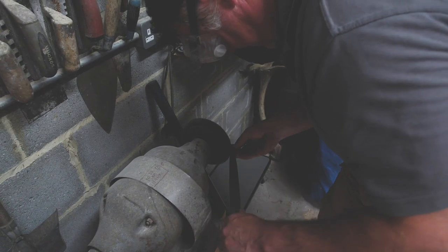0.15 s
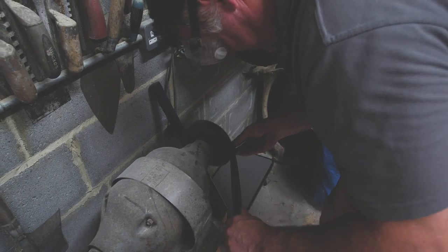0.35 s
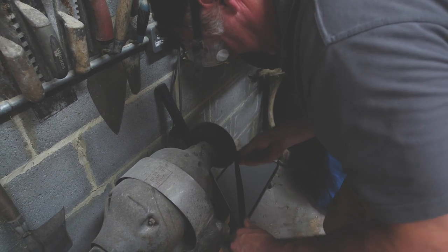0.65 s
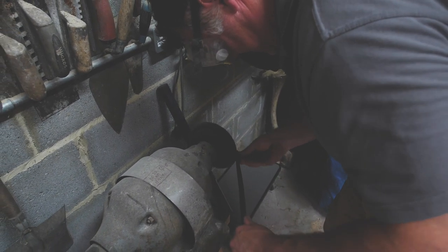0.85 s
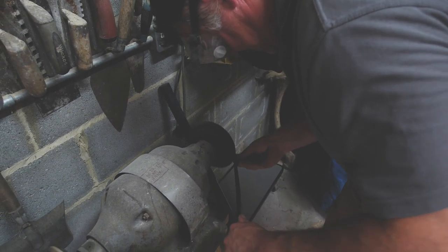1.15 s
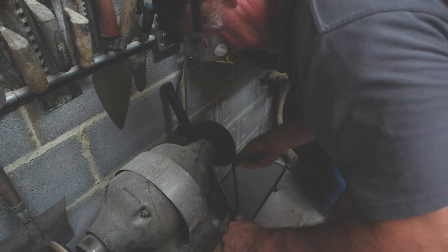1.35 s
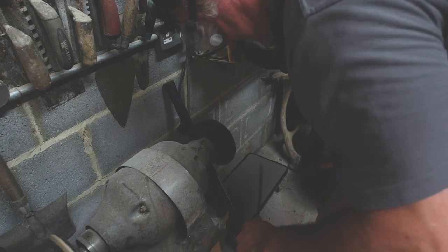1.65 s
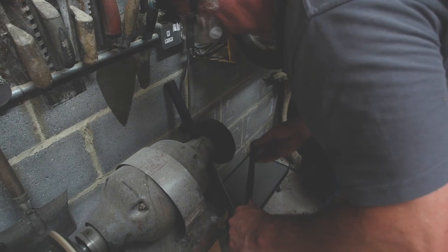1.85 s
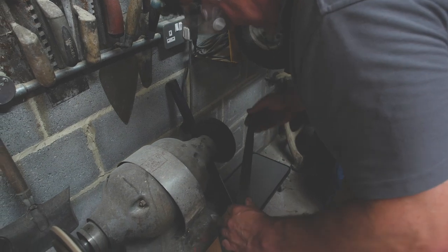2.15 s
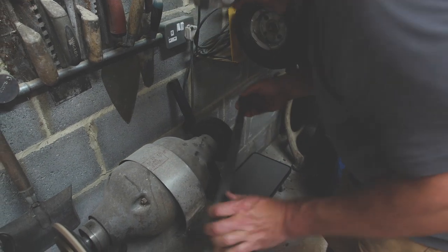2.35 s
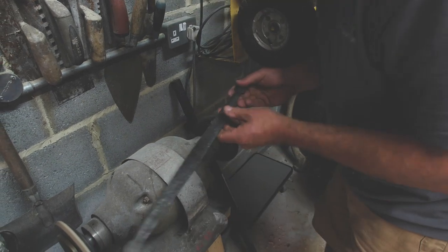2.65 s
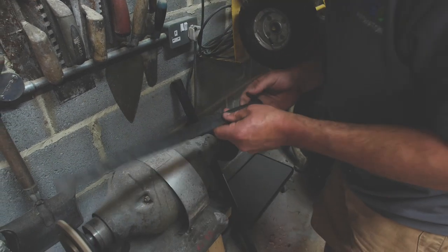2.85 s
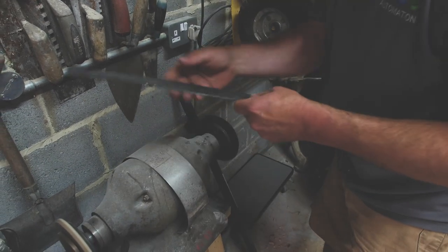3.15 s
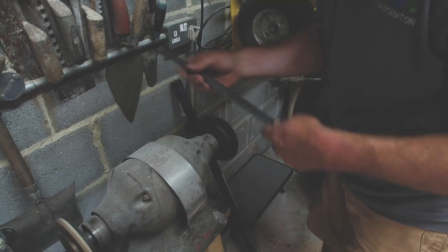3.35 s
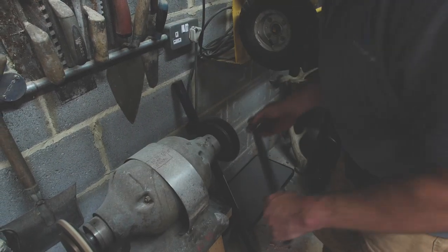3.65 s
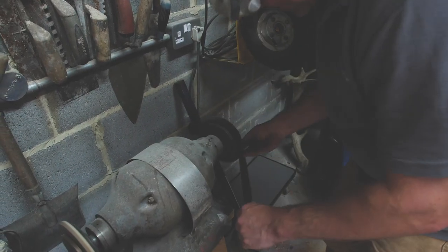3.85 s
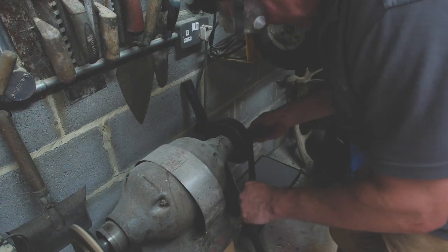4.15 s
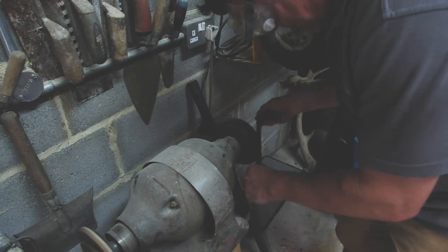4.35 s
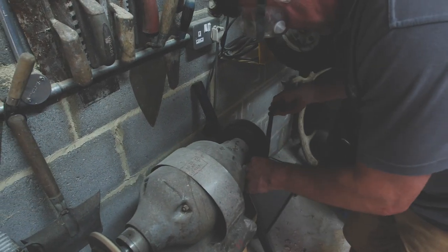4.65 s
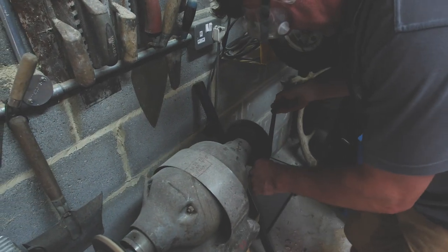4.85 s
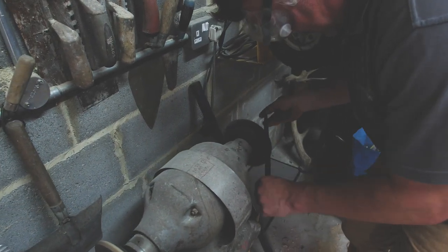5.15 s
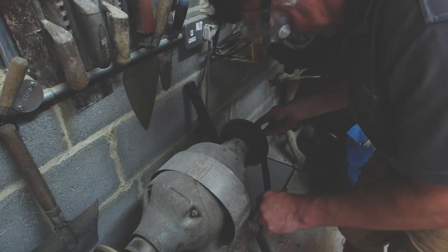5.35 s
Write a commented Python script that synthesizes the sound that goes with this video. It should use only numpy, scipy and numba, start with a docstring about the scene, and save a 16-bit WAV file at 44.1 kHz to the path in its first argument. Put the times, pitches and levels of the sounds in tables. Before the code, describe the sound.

Close, centred sound of a bench grinder: loud ringing steel at first, fading to a rough hiss that varies with hand pressure. The grinding stops for over two seconds, exposing a steady motor hum, rumble, fast faint ticks and small double knocks. Then steel touches again, swelling briefly and thinning into a gritty scrape in a tight, dry room.

```python
"""A long steel blade sings shrilly on a motor-driven grinding wheel in a small block-walled workshop.
It settles to a hissing rasp, is lifted off and is laid on again: random grit drives the resonances
of wheel and blade, and the hand's pressure sets their level. Underneath, tones at shaft orders and
shaped noise make the machine hum, throb, rumble and whirr; noise bursts tick once a turn and, while
the blade is off, rattle in pairs."""
import sys
import numpy as np
from scipy import signal
from scipy.fft import rfft, irfft, next_fast_len
from scipy.io import wavfile
from numba import njit

SR = 44100
rng = np.random.default_rng(int(sys.argv[2]) if len(sys.argv) > 2 else 0)


def materialize(psi):
    """Save the field psi as 16-bit PCM at rate SR to the path in sys.argv[1].

    A 1-D psi becomes a single channel; in a 2-D psi each row is a channel.
    """
    bounded = np.clip(np.atleast_2d(psi).T, -1, 1)
    quanta = np.round(bounded * 32767).astype(np.int16)
    wavfile.write(sys.argv[1], SR, quanta)


N = 242545
TIME = np.arange(N) / SR
SIZE = next_fast_len(N, True)
HZ = np.fft.rfftfreq(SIZE, 1 / SR)

SHAFT_HZ = 24.982
FIRST_TICK_S = 0.02  # the wheel's high spot first passes

# the blade lies on the wheel: start_s, end_s, starting damping (factor on the modes' width),
# centre_hz that the contact excites most, treble offset_db
PASSES = [(0.0, 1.522, 3.4, 6200, 0), (3.968, 5.5, 2.4, 7300, 1)]
# colour of the gritty treble, shared by fizz and grazes: frequency_hz, relative density_db
FIZZ_COLOUR = [(3500, -51), (4700, -5.5), (6200, 0), (8300, -1.5), (11500, -2.5), (14500, 1), (16000, -10)]


def gain_of(db):
    """Decibels to amplitude."""
    return 10 ** (np.asarray(db) / 20)


def evened(x):
    """Scales to rms 1."""
    return x / np.sqrt(np.mean(x ** 2) + 1e-20)


def shape(points):
    """Gain at every frequency from (Hz, dB) points, falling 24 dB an octave beyond the ends."""
    hz, db = np.transpose(points)
    octave, known = np.log2(HZ + 1), np.log2(hz)
    beyond = abs(octave - np.clip(octave, known[0], known[-1]))
    return gain_of(np.interp(octave, known, db) - 24 * beyond)


def filtered(x, response):
    """Filters x by a frequency response."""
    return irfft(rfft(x, SIZE) * response, SIZE)[:N]


def coloured(x, response):
    """Filters x by a frequency response and scales to rms 1."""
    return evened(filtered(x, response))


def mode(hz, width_hz):
    """Frequency response of one resonance, gain 1 at its centre."""
    return 1 / (1 + 2j * (HZ - hz) / width_hz)


def noise():
    """White noise of rms 1."""
    return rng.standard_normal(N)


def drift(rate_hz):
    """Slow random wander of rms 1: noise whose spectrum falls off around the rate."""
    size = 2048
    hz = np.fft.rfftfreq(size, TIME[-1] / size)
    spectrum = rfft(rng.standard_normal(size)) * np.exp(-(hz / rate_hz) ** 2)
    slow = irfft(spectrum * (hz > 0))
    return np.interp(TIME, np.linspace(0, TIME[-1], size), evened(slow))


def swell(centre_s, half_s):
    """A smooth bump of height 1 around a moment."""
    return np.exp(-((TIME - centre_s) / half_s) ** 2)


def runout(depth_db):
    """The wheel is slightly out of true: a swell once a turn."""
    turns = SHAFT_HZ * (TIME - FIRST_TICK_S)
    return gain_of(depth_db * np.cos(2 * np.pi * (turns - .15)))


def contact(touch_s=0.0074, lift_s=0.011):
    """1 while the blade lies on the wheel, 0 while it is lifted, with short ramps between."""
    ramps = [np.interp(TIME, [on - touch_s, on, off, off + lift_s], [0, 1, 1, 0]) for on, off, *_ in PASSES]
    return sum(ramps)


def pass_age():
    """Which pass is the latest at each moment, and the seconds since it began."""
    starts = np.transpose(PASSES)[0]
    latest = np.searchsorted(starts[1:], TIME)
    return latest, np.maximum(TIME - starts[latest], 0)


def throb(crest_db=-53, loaded_db=-4, belt_hz=3.02, crest_s=1.27, depth=0.64):
    """The motor's deep hum swells once per lap of the drive belt, less while the blade steadies it."""
    lap = 1 + depth * np.cos(2 * np.pi * belt_hz * (TIME - crest_s))
    level = gain_of(crest_db + loaded_db * contact()) * lap / 2  # full level would need a lap gain of 2
    phase = 2 * np.pi * 2 * SHAFT_HZ * TIME + 0.397 * drift(3.6)
    return level * np.sqrt(2) * np.sin(phase)


def motor(hum_trim_db=-0.65, waver=0.25):
    """Half-orders of the shaft waver in pitch and level over the rumble of the housing."""
    # hum of the drive: multiple of half the shaft speed, level_db before the trim
    hum_orders = [(5, -63), (6, -64), (7, -62), (8, -56.5), (10, -57.5), (13, -54.5), (14, -59.5),
                  (16, -56), (18, -60.5), (20, -60), (21, -66), (22, -58.5), (24, -61), (26, -61.5),
                  (27, -64.5)]
    # rumble of the housing: frequency_hz, relative density_db
    rumble_colour = [(15, -43), (25, -15), (49, -18), (75, -23), (108, -4.5), (139, -14), (166, 2),
                     (211, 1.5), (231, -22.5), (252, -4), (301, 7), (364, -5.5), (398, -21), (447, -33),
                     (520, -9.5), (680, -62), (1140, -120)]
    hum = np.zeros(N)
    for order, level_db in hum_orders:
        turns = order * SHAFT_HZ / 2 * TIME
        phase = 2 * np.pi * (turns + rng.random()) + waver * drift(2.7)
        hum += gain_of(level_db) * np.sqrt(2) * (1 + waver * drift(2.04)) * np.cos(phase)

    # the rumble grows as the load builds up, and dips for a while after the first lift-off
    idle_db, load_db, load_build_s = -47, 3.5, .4
    lull_db, lull_after_s, lull_half_s = -5.5, 0.57, 0.41
    load = contact() * np.minimum(pass_age()[1] / load_build_s, 1) ** 2
    lull = swell(PASSES[0][1] + lull_after_s, lull_half_s)
    rumble = gain_of(idle_db + load_db * load + lull_db * lull) * coloured(noise(), shape(rumble_colour))
    return gain_of(hum_trim_db) * hum + rumble


def whine(trim_db=1.5, loaded_hz=24.92, waver=0.7):
    """Under load, higher orders of a slightly slower shaft speed stand out."""
    # whine of the drive: multiple of the loaded shaft speed, level_db before the trim
    whine_orders = [(24, -67.5), (28, -66), (30, -73), (36, -72.5), (39, -63), (43, -78.5)]
    out = np.zeros(N)
    for order, level_db in whine_orders:
        phase = 2 * np.pi * (order * loaded_hz * TIME + rng.random()) + waver * drift(21)
        out += gain_of(level_db) * np.sqrt(2) * (1 + waver * drift(4.33)) * np.cos(phase)
    return gain_of(trim_db) * contact() * out


def wheel(whirr_db=-55.0, tick_db=-67.0, weak_db=-6.5, scatter_db=3.5, tick_decay_s=0.0034):
    """The spinning wheel whirrs as shaped noise and ticks each turn, weak and strong by turns."""
    # whirr of the wheel: frequency_hz, relative density_db
    whirr_colour = [(240, -14.5), (400, -2.5), (498, -17.5), (528, -13.5), (793, -12.5), (1280, -16.5),
                    (1460, -22.5), (1870, -14), (2040, -19.5), (2140, -22), (3350, -19), (5040, -32.5),
                    (6560, -36.5), (8770, -43), (13000, -51)]
    # tick of the wheel: frequency_hz, relative density_db
    tick_colour = [(2400, -11), (3400, 10), (4400, -5.5), (5700, -29.5), (6500, 0), (7300, -8),
                   (8500, -21.5), (12300, -22.5), (13300, -10.5), (14500, -21), (16000, -16.5)]
    whirr = gain_of(whirr_db) * coloured(noise(), shape(whirr_colour)) * runout(depth_db=1.16)

    turn, part = np.divmod(SHAFT_HZ * (TIME - FIRST_TICK_S), 1)
    turn = turn.astype(int)
    scatter = scatter_db * (2 * rng.random(turn.max() + 2) - 1)
    force_db = weak_db * (turn % 2 == 0) + scatter[turn]
    blows = np.exp(-part / SHAFT_HZ / tick_decay_s) * gain_of(force_db)
    return whirr + gain_of(tick_db) * coloured(blows * noise(), shape(tick_colour))


def rattles(decay_s=0.011, rise_s=0.0006, width_hz=260, ring_db=6):
    """A loose part knocks twice, one shaft turn apart; each pair stresses one of its resonances."""
    # pairs of knocks: start_s, first_db, second_db (both before rise, decay and the final sqrt(2)), ring_hz
    knock_pairs = [(1.788, -51, -55, 1600), (2.187, -49, -61, 1890), (2.509, -51.5, -49, 2620),
                   (2.831, -52, -51, 1320), (2.913, -50, -52.5, 1380), (3.151, -54, -48.5, 1500),
                   (3.269, -53, -53.5, 1900), (3.511, -49.5, -53, 2670), (3.914, -52.5, -56, 1850)]
    # colour of the knocks: frequency_hz, relative density_db
    knock_colour = [(500, -47), (1000, 10.5), (1350, 1.5), (1650, -1.5), (2200, 1), (2750, -3.5),
                    (3600, -5.5), (6000, -32)]
    colour, out = shape(knock_colour), np.zeros(N)
    for start_s, first_db, second_db, ring_hz in knock_pairs:
        ring = gain_of(ring_db) * mode(ring_hz, width_hz)
        chatter = coloured(noise(), colour * (1 + ring))
        for turn, knock_db in enumerate((first_db, second_db)):
            age = np.maximum(TIME - start_s - turn / SHAFT_HZ, 0)
            envelope = (1 - np.exp(-age / rise_s)) * np.exp(-age / decay_s)
            out += gain_of(knock_db) * envelope * chatter
    return np.sqrt(2) * out


def grazes():
    """Light brushes on the steel: brief bright noise while the blade is lifted and brought back."""
    # grazes: centre_s, peak level_db, half length_s
    brushes = [(1.6, -54.5, .007), (3.538, -74, 0.065), (3.562, -73, .015)]
    level = sum(gain_of(level_db) * swell(centre_s, half_s) for centre_s, level_db, half_s in brushes)
    return level * coloured(noise(), shape(FIZZ_COLOUR))


def grit(per_s, spread_db, smooth):
    """Countless grains strike the steel, a few of them hard, over an even scraping."""
    sizes = gain_of(spread_db * np.minimum(rng.exponential(1, N), 4)) * rng.choice([-1, 1], N)
    strikes = sizes * (rng.random(N) < per_s / SR)
    return evened(evened(strikes) + smooth * noise())


def rasp(wander_db=2.0):
    """Grit drags through the resonances of wheel and blade; each swells and fades as the contact shifts."""
    # colour of the rasp: frequency_hz, relative density_db
    rasp_colour = [(250, -51), (450, -16), (800, -11), (1100, -14), (1800, -14), (2500, -13), (3200, -7.5),
                   (4000, -9), (4700, -16), (6500, -21.5)]
    # broad resonances of the wheel and the held blade: centre_hz, width_hz, gain_db over the rasp
    body_modes = [(604, 50, 0), (740, 60, 3), (967, 38, 6.5), (1263, 23, 6.5), (1529, 74, 6.5),
                  (2092, 197, 6.5), (2754, 113, 6), (3180, 41, -6), (3323, 220, 6.5), (3830, 88, -4),
                  (4090, 108, -2)]
    colour = shape(rasp_colour)
    out = filtered(grit(per_s=3000, spread_db=2.0, smooth=0.89), colour)
    for centre_hz, width_hz, gain_db in body_modes:
        level = gain_of(gain_db + wander_db * drift(7.6))
        out += level * filtered(noise(), colour * mode(centre_hz, width_hz))
    return evened(out)


def bite(pressure_db, hz=3820, width_hz=430, hard_db=-36, level_db=-41.0, growth=3.5):
    """A harsh upper band rises steeply with pressure, so that it flares only under a hard hand."""
    band = coloured(noise(), mode(hz, width_hz) ** 2)
    return band * gain_of(level_db + growth * np.minimum(pressure_db - hard_db, 1))


@njit
def resonate(x, keep, turn):
    """One resonance of gain 1: each sample it turns by a fixed angle and keeps a varying share of its swing."""
    out, swing = np.zeros(len(x), np.complex128), 0j
    for i in range(len(x)):
        swing = keep[i] * turn * swing + (1 - keep[i]) * x[i]
        out[i] = swing
    return out


def ringing(hz, width_hz, skirt=7.0):
    """Grit rings one mode whose width follows a curve; a second, broader resonance steepens its skirts."""
    x = grit(per_s=920, spread_db=1.5, smooth=.3) + 0j
    for w in (width_hz, skirt * width_hz):
        x = resonate(x, np.exp(-np.pi * w / SR), np.exp(2j * np.pi * hz / SR))
    return evened(x.real / np.sqrt(width_hz))


def fizz(damping, centre_hz, reach_octaves=0.66, width_hz=60, slide_db=3, flutter_db=2.5, hiss_db=-11.0):
    """Grit sets the blade's modes singing; lying flat on the wheel damps them towards a plain hiss."""
    # bending and twisting modes of the blade: mode_hz, drive_db at a damping of 1
    blade_modes = [(4890, 1), (5760, -3), (6720, -1), (7770, 0), (8825, 1), (9060, -7), (9970, 0),
                   (10280, -9), (11180, 0), (11560, -7), (12450, 1), (12880, -8), (13740, -4), (14170, -6),
                   (15160, -6), (15550, -4)]
    spread = np.sqrt(damping)  # a broad contact drives all modes more evenly
    ring, power = np.zeros(N), np.zeros(N)
    for mode_hz, drive_db in blade_modes:
        # each mode swells and fades as the contact passes its nodes
        wander_db = slide_db * spread / 2 * drift(6.4)
        distance = np.log2(mode_hz / centre_hz) ** 2 / (spread * reach_octaves ** 2)
        drive = gain_of(drive_db / spread + wander_db) / (1 + distance)
        flutter = evened(gain_of(flutter_db * drift(44.7)))
        ring += drive * ringing(mode_hz, width_hz * damping) * flutter
        power += drive ** 2
    share = gain_of(hiss_db) * damping ** .75
    hiss = coloured(grit(per_s=3800, spread_db=2.0, smooth=0.87), shape(FIZZ_COLOUR))
    return (ring / np.sqrt(power) + share * hiss) / np.hypot(1, share)


def singing(pressure_db):
    """The blade's treble follows the pressure: shrill while it rings freely, softer then duller once flat."""
    # one early flare of the singing: centre_s, gain_db, half length_s
    flare_s, flare_db, flare_half_s = (0.03, 4.5, 0.043)
    # at first the blade rings freely, louder and less damped; then it settles flat, then dulls
    free_until_s, settle_s, dull_s = 0.27, 0.4, 0.29
    free_gain_db, free_damping = 14, .85
    # meanwhile the contact slides along it and excites ever higher modes
    free_start_hz, climb_octaves_per_s, free_top_hz = 8300, 2.3, 13700
    # the longer a pass lasts, the flatter the blade lies
    damping_doubles_s = 1.3
    # the treble grows more slowly than the rasp: growth in dB per dB of pressure
    usual_press_db, usual_treble_db, growth = -44.5, -50.5, 0.76

    *_, flat_damping, flat_hz, pass_db = np.transpose(PASSES)
    latest, age = pass_age()
    flat = np.clip((TIME - free_until_s) / settle_s, 0, 1)
    dulled = np.clip((TIME - free_until_s - settle_s) / dull_s, 0, 1)
    pressed_damping = flat_damping[latest] * 2 ** (age / damping_doubles_s)
    damping = free_damping + (pressed_damping - free_damping) * flat
    free_hz = np.minimum(free_start_hz * 2 ** (climb_octaves_per_s * TIME), free_top_hz)
    centre_hz = free_hz + (flat_hz[latest] - free_hz) * dulled
    level_db = usual_treble_db + pass_db[latest] + growth * (pressure_db - usual_press_db)
    level_db = level_db + free_gain_db * (1 - flat) + flare_db * swell(flare_s, flare_half_s)
    return fizz(damping, centre_hz) * gain_of(level_db)


def grinding(rasp_trim_db=-1.0, judder_db=0.9):
    """Rasp, singing and bite follow the hand's pressure, and judder a little on the wheel."""
    # the hand in the first pass: time_s, pressure_db (level of the rasp before its trim)
    first_press = [(0.0, -38), (0.08, -39), (0.21, -34.5), (0.372, -39), (0.71, -40.5), (0.744, -44),
                   (1.02, -43.5), (1.054, -49), (1.16, -41.5), (1.244, -48), (1.286, -40), (1.358, -41.5),
                   (1.418, -36.5), (1.52, -43.5)]
    # the hand in the second pass: time_s, pressure_db (level of the rasp before its trim)
    second_press = [(3.97, -45), (4.196, -38.5), (4.33, -43), (4.466, -42.5), (4.474, -40), (4.676, -43.5),
                    (5.206, -46), (5.362, -48.5), (5.48, -47)]
    pressure_db = np.interp(TIME, *np.vstack([first_press, second_press]).T)
    out = rasp() * gain_of(pressure_db + rasp_trim_db)
    out += singing(pressure_db) + bite(pressure_db)
    return contact() * out * runout(depth_db=0.74) * gain_of(judder_db * drift(44))


def workshop(x, wet_db=-11, t60_s=.18):
    """Close surfaces return a few softened reflections and a short, dense tail of random echoes."""
    # nearest surfaces: delay_s, gain (linear, its sign the polarity)
    reflections = [(.0023, .18), (.0041, -.2), (.0067, .2), (.0098, -.18)]
    echoes = noise() * (rng.random(N) < 2000 / SR) * (TIME > .008)
    tail = echoes * gain_of(-60 * TIME / t60_s)
    response = gain_of(wet_db) * tail[:SR // 2] / np.linalg.norm(tail)
    response[0] = 1  # direct sound
    for delay_s, gain in reflections:
        # a sinc five samples wide dulls the reflection
        response += gain * np.sinc((TIME[:SR // 2] - delay_s) * SR / 5) / 5
    return signal.fftconvolve(x, response)[:N]


def scene(self_noise_db=-78):
    """The machine and the blade over the microphone's faint hiss, the same in both channels."""
    mono = motor() + throb() + whine()
    mono += workshop(wheel() + rattles() + grinding() + grazes())
    mono += gain_of(self_noise_db) * noise()
    return np.array([mono, mono])


def record(dry, edge_hz=15900):
    """Band limit: a steep low-pass takes away the treble above its edge."""
    lowpass = signal.firwin(1023, edge_hz, window=("kaiser", 9), fs=SR)
    return signal.oaconvolve(dry, lowpass[None], "same")


dry = scene()
out = record(dry)
materialize(out)
```